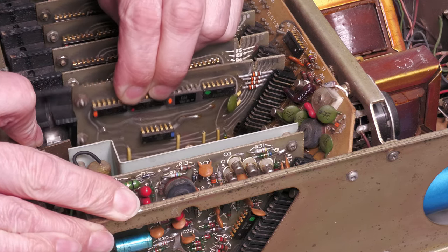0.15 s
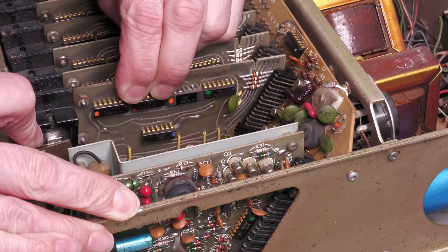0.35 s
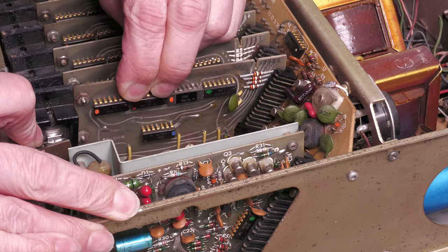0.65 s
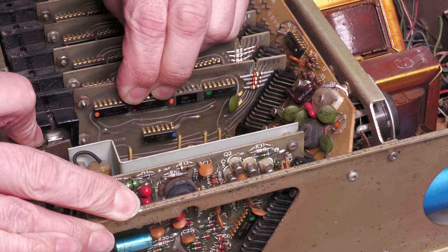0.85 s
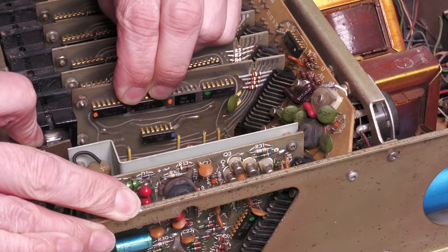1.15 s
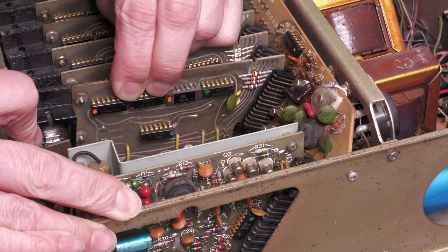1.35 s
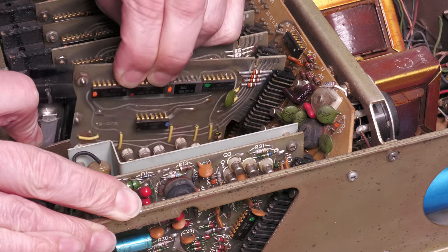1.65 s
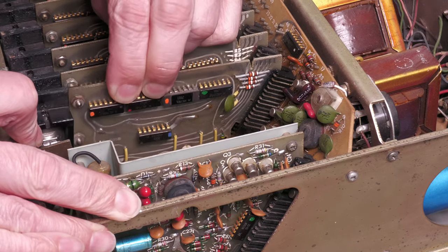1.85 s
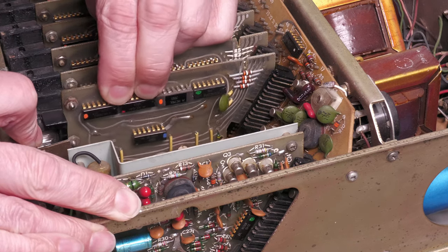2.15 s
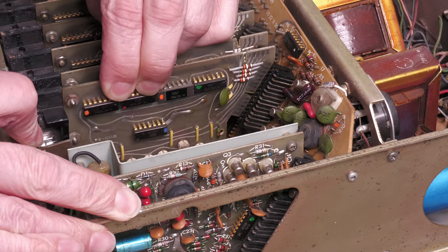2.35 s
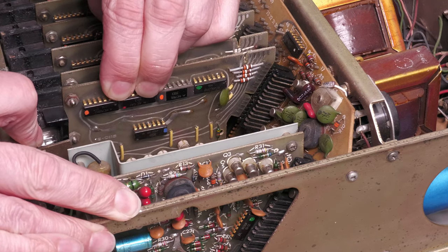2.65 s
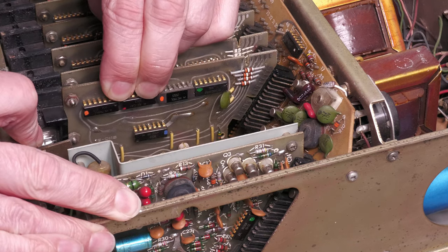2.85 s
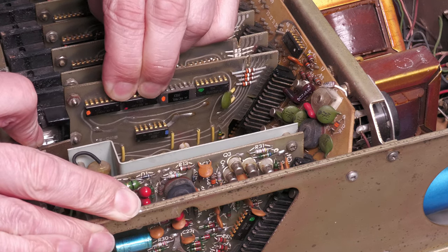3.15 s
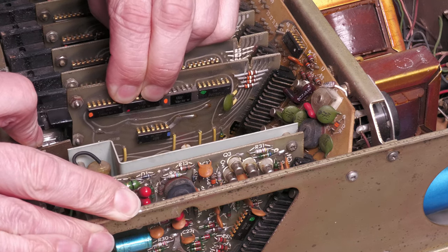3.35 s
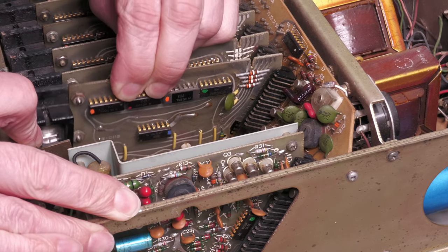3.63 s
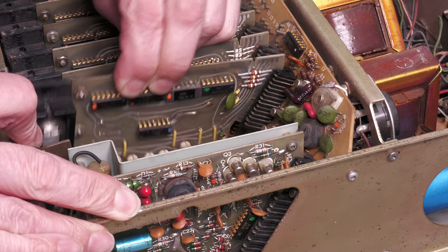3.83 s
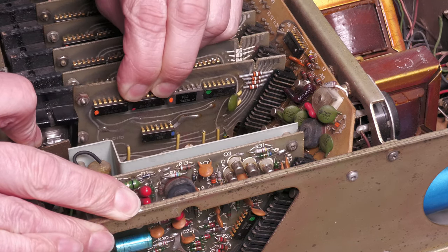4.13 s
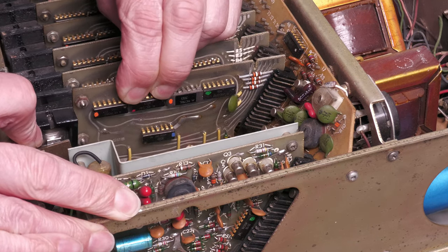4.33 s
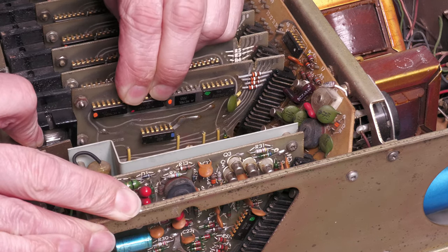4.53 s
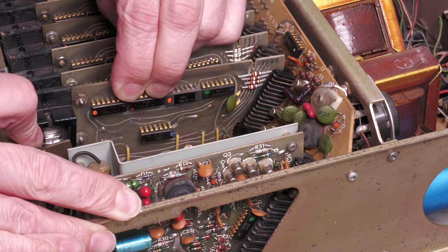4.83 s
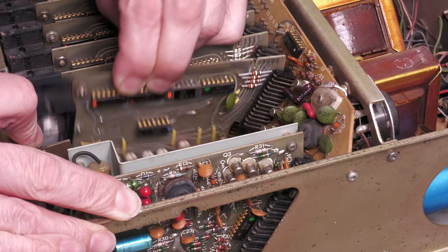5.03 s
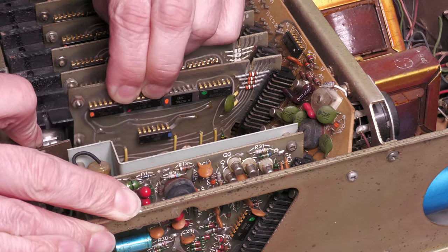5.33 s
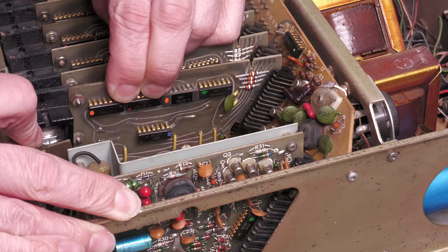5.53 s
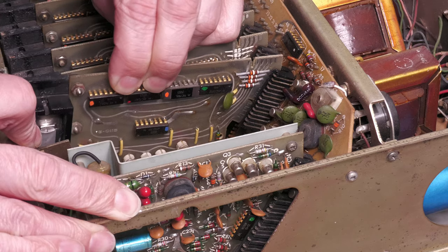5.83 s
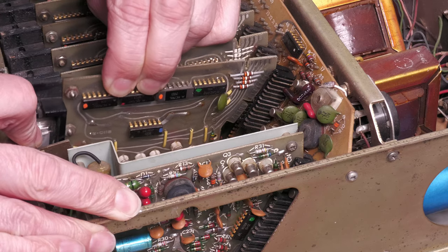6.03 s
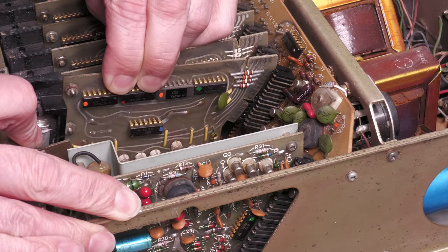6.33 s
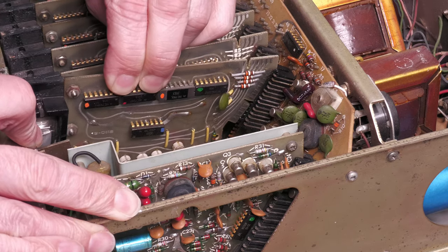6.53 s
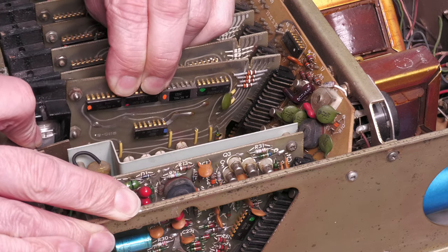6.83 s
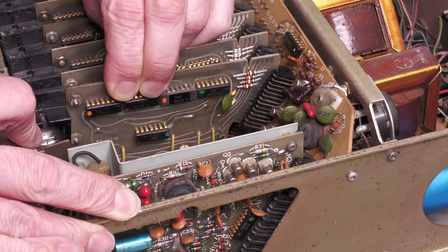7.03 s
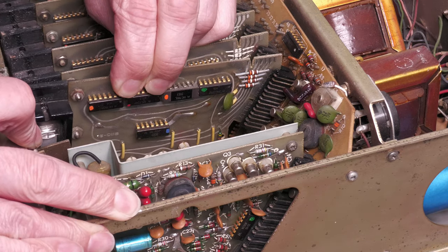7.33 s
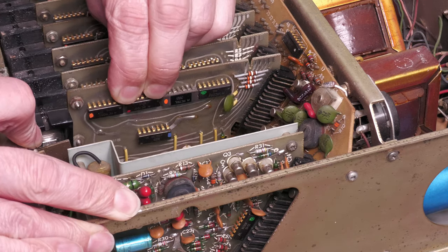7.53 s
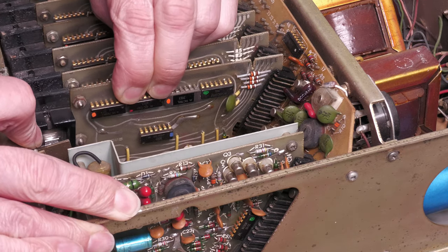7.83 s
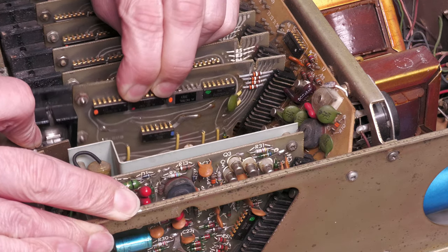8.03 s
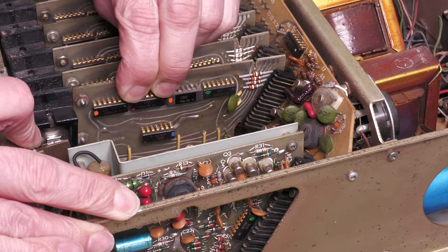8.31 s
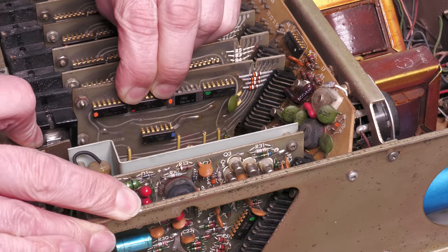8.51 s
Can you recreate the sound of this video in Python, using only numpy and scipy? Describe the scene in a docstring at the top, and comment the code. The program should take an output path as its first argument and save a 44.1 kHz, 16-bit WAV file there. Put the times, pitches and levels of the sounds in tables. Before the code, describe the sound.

A circuit card is rocked in and out of its connector inside a metal chassis. The spring contacts give short, high squeaks, often in little clusters, mixed with light knocks, sharp clicks and soft scrapes as the card meets its guides. The sounds come irregularly throughout, with brief pauses. It is heard up close in a small room, over a faint, steady machine hum.

```python
"""Short squeaks, scrapes and knocks over a faint machine hum in a small room.
A circuit card is rocked in and out of its edge connector inside a metal instrument chassis.
The spring contacts stick, slip and snap; the card knocks against its guides and seat.
Gain control ducks on the loud squeaks."""
import sys
import numpy as np
from scipy import signal
from scipy.fft import rfft, irfft
from scipy.io import wavfile
from scipy.ndimage import uniform_filter1d

SR = 44100
rng = np.random.default_rng(int(sys.argv[2]) if len(sys.argv) > 2 else 0)


def bounce(signal):
    """Save signal as a 16-bit WAV file at the path given by the first command-line argument."""
    frames = np.transpose(np.atleast_2d(signal))
    limited = np.clip(frames, -1, 1)
    pcm = np.round(limited * 32767).astype(np.int16)
    wavfile.write(sys.argv[1], SR, pcm)


N = 382344
TIME_S = np.arange(N) / SR

# Contact stick-slip. Each row: start in seconds, length in seconds, pitch in Hz, glide in Hz, level in dB.
SQUEAK_EVENTS = [ (0.128, 0.026, 2470, 18, -42.5), (0.143, 0.03, 2488, -17, -36),
                 (1.339, 0.042, 3585, -180, -51.5), (1.596, 0.0089, 3600, 0, -43.5),
                 (1.608, 0.047, 3346, -360, -30), (1.736, 0.04, 2310, -84, -32.5),
                 (1.774, 0.05, 2500, 447, -45), (1.967, 0.026, 3320, -130, -33.5),
                 (2.087, .04, 2600, -200, -50), (2.104, 0.057, 2210, 190, -37),
                 (3.52, 0.027, 3360, 40, -55.5), (3.546, .015, 3178, -50, -40.5),
                 (3.627, 0.061, 2650, 320, -60), (3.872, 0.012, 3244, -80, -35),
                 (3.907, 0.019, 2354, -100, -39.5), (3.985, 0.039, 2447, -10, -31.5),
                 (4.021, 0.031, 2697, -150, -49), (4.407, 0.023, 3240, 60, -58),
                 (4.757, 0.029, 3026, -370, -47.5), (5.07, 0.026, 3297, -110, -30),
                 (5.158, 0.059, 2345, -6, -28.5), (5.261, 0.038, 2130, 380, -32),
                 (5.393, 0.029, 3384, -300, -40.5), (5.733, 0.034, 2422, -130, -36),
                 (5.833, .04, 2440, -220, -32), (5.915, .039, 2440, 40, -46.5),
                 (6.882, 0.064, 2550, 80, -68), (7.274, 0.022, 3315, -210, -31),
                 (7.466, 0.022, 1960, 406, -40), (7.483, 0.024, 2330, 55, -36.5),
                 (7.624, 0.035, 3376, -120, -37.5), (7.66, 0.043, 3266, 0, -35.5),
                 (7.784, 0.027, 2616, 247, -47.5), (7.926, 0.038, 3460, -340, -52),
                 (7.973, 0.014, 3330, 123, -45), (8.179, 0.021, 3270, 40, -53.5)]
# Radiation of the springs. Each row: frequency in Hz, gain in dB.
SPRING_RESPONSE = [(1850, -6.5), (2130, -15.5), (2350, 1), (3400, -0.5), (4400, 5.5), (5000, 6.5),
                   (6700, -3.5), (7300, -1.5), (8700, 9.5), (10000, -2), (15000, 7)]
# Card hits guides and seat. Each row: start in seconds, clack in dB, tick and thump in dB over the clack.
KNOCK_EVENTS = [(0.0145, -43, 8, -14), (0.2347, -41, -25, -25), (0.2424, -60, 19, 6.5),
                (0.4995, -52, -40, -9.5), (0.6384, -56, -4, -11), (0.7936, -45.5, -27, -12),
                (1.3698, -59, -7, -5), (1.598, -66, 9, 7), (1.95, -57, 8.5, -2),
                (2.1785, -36.5, -13.5, -17), (2.1862, -34.5, -33, -34), (2.2826, -43.5, 7.5, -3.5),
                (2.77, -38, -4.5, -18), (3.257, -39, -5, -13.5), (3.716, -42, -4, -20.5),
                (3.8645, -52.5, 11, 0.5), (3.87, -42.5, 6, -28), (4.0446, -50.5, 11, -11),
                (4.146, -53.5, 4, 1), (4.327, -46.5, -54, -16), (4.701, -55, -5, -31),
                (5.005, -58.5, 9, 0.5), (5.4124, -47.5, 0, -5.5), (5.6079, -60.5, 2.5, -6),
                (5.7211, -43.5, 8.5, -13.5), (5.9761, -43, -17, -13), (5.9839, -37, -5, -24),
                (6.479, -51, -18, -21), (7.0558, -45, -7.5, -17), (7.6451, -55, 14.5, -3.5),
                (7.9548, -53.5, 4, -7), (8.109, -42, -9.5, -22), (8.1358, -48.5, 6, -13),
                (8.2045, -48.5, -7, -23)]
# A spring snaps over the card's edge. Each row: start in seconds, level in dB.
SNAP_EVENTS = [(0.0151, -39), (2.2794, -38.5), (2.3836, -56), (3.257, -40), (3.715, -29.5), (3.7283, -35.5),
               (6.479, -52.5)]
# Force of a snap. Each row: frequency in Hz, gain in dB.
SNAP_SPECTRUM = [(1300, -46), (5000, -15.5), (12000, 4.5)]
# Dense crack of a blow. Each row: frequency in Hz, octave-band gain in dB.
CRACK_SPECTRUM = [(150, 7), (300, -2.5), (600, 1.5), (1200, -3.5), (2400, 5), (4800, 7), (9600, 1.5),
                  (15000, -11)]
# Card and chassis modes. Each row: frequency in Hz, gain in dB, T60 in seconds.
BODY_MODES = [(135.9, 5, 0.38), (224.2, 13, 0.23), (268.7, 7, 0.11), (400.7, 2.5, 0.19), (485, -1, 0.21),
              (579, 3.5, 0.11), (853, 3, 0.098), (889, 6.5, 0.038), (1127, -2.5, 0.17), (1572, -0.5, 0.076),
              (1818, 0.5, 0.079), (2520, 2, 0.061), (3080, -7, 0.054), (3612, 8, 0.023), (4770, 10, 0.019),
              (5100, 5, 0.032), (7260, -5, 0.17), (8180, 5.5, 0.025)]
# Card slides on contacts and guides. Each row: start in seconds, length in seconds, level in dB.
SCRAPE_EVENTS = [(1.835, 0.04, -54), (3.25, 0.025, -51.5), (3.63, 0.07, -65), (3.78, 0.013, -71),
                 (5.722, 0.027, -44.5), (5.954, 0.045, -46.5), (6.065, 0.036, -57), (6.615, .024, -63.5),
                 (6.74, 0.3, -70), (7.462, 0.075, -55.5), (7.78, 0.083, -56.5), (7.95, 0.072, -69),
                 (8.065, 0.02, -55), (8.15, 0.13, -81), (8.32, .036, -63)]
# Friction noise. Each row: frequency in Hz, relative density in dB.
FRICTION_SPECTRUM = [(120, -4.5), (650, -9), (880, 2), (1150, -10.5), (1900, -7), (2600, 0), (3500, -7),
                     (4800, -4), (6200, -14), (8200, -10.5), (10500, -22.5), (15000, -19.5)]
# Reflections off chassis walls and bench. Each row: delay in seconds, gain in dB.
EARLY_ECHOES = [(.0029, -15.5), (.0074, -14), (0.011, -11.5)]
# Mains hum and fan whine. Each row: frequency in Hz, RMS level in dB.
HUM_TONES = [(150.7, -73.5), (199.2, -75), (468.3, -70), (1270, -81.5), (1340, -71.5), (2056, -80.5),
             (2143, -79.5), (2261, -86), (2412, -87), (3214, -92.5), (3483, -90), (4016, -91)]
# Room noise. Each row: frequency in Hz, relative density in dB.
AIR_SPECTRUM = [(30, -24), (90, -47), (112, -17), (135, -10.5), (280, 2), (340, -6), (620, -4.5),
                (950, -7.5), (1500, -15), (2200, -15.5), (3000, -21.5), (6500, -29.5), (15500, -33.5)]


def squeaks(firm_db=-32.5, sag_hz=135.4, jitter=0.02, beat_hz=120, flutter_db=4, brightening=0.77):
    """A contact spring sticks and slips; pressure flattens its pitch and strengthens its harmonics."""
    out = np.zeros(N)
    for start_s, length_s, pitch_hz, glide_hz, level_db in SQUEAK_EVENTS:
        progress, swell = stroke(length_s, fullness=0.6)
        size = len(progress)
        swell *= (1 - np.exp(-progress / 0.12)) ** 2   # vibration builds up
        push_db = level_db - firm_db
        bend_hz = sag_hz * from_db(push_db) * (2 * progress - 1) ** 2   # lowest in mid-slide
        hz = pitch_hz + glide_hz * (progress - 0.5) + bend_hz
        phase = 2 * np.pi * np.cumsum(hz * (1 + jitter * drift(867, size))) / SR
        # a fast flutter that deepens through the squeak
        beating_tone = np.sin(phase + 2 * np.pi * (beat_hz * TIME_S[:size] + rng.random()))
        tone = (np.sin(phase) + 0.37 * progress * beating_tone) * from_db(db_at(SPRING_RESPONSE, hz))
        for k, harmonic_db in enumerate((-7, -14.5, -22.5, -30.5, -38.5), start=2):
            partial_db = harmonic_db + brightening * push_db + db_at(SPRING_RESPONSE, k * hz)
            partial_db += 3 * drift(92, size)
            tone += from_db(partial_db) * np.sqrt(swell) * np.sin(k * phase)
        grip = from_db(level_db + flutter_db * drift(220, size))
        rasp = 1 + 0.015 * drift(2300, size)
        add(out, start_s, grip * rasp * swell * tone * np.sqrt(2))
    return out


def blow_forces():
    """Start and force spectrum of each blow: a knock is thump, clack and tick; a snap is all treble."""
    for start_s, clack_db, hardness_db, weight_db in KNOCK_EVENTS:
        thump_db, tick_db = clack_db + weight_db, clack_db + hardness_db
        yield start_s, [(220, thump_db), (800, clack_db), (1300, clack_db),
                        (5000, tick_db), (12000, tick_db - 27)]
    for start_s, level_db in SNAP_EVENTS:
        yield start_s, [(hz, level_db + force_db) for hz, force_db in SNAP_SPECTRUM]


def knocks_and_snaps(crack_db=-5, ring_db=-11, spread_db=3, rise_cycles=0.13, detune=0.026):
    """Each blow cracks, dying fastest in the treble, and rings the card and chassis modes."""
    out, t = np.zeros(N), TIME_S[:SR // 3]
    centres_hz = np.geomspace(160, 12500, 7)
    bands = [signal.butter(2, [hz / np.sqrt(2), hz * np.sqrt(2)], "band", fs=SR, output="sos")
             for hz in centres_hz]
    for start_s, force in blow_forces():
        blow = np.zeros(len(t))
        for hz, band in zip(centres_hz, bands):
            t60_s = 0.047 * (1000 / hz) ** 0.56
            envelope = (1 - np.exp(-t * hz / rise_cycles)) * from_db(-60 * t / t60_s)
            burst = rng.standard_normal(len(t)) * envelope * np.sqrt(SR / hz / np.sqrt(2))
            band_db = crack_db + db_at(CRACK_SPECTRUM, hz) + db_at(force, hz)
            blow += from_db(band_db) * signal.sosfilt(band, burst)
        for mode_hz, mode_db, t60_s in BODY_MODES:
            hz = mode_hz * (1 + detune * rng.standard_normal())   # grip and seating shift the modes
            rise = 1 - np.exp(-t * hz / rise_cycles)
            level_db = ring_db + mode_db + db_at(force, hz) + spread_db * rng.standard_normal()
            blow += from_db(level_db - 60 * t / t60_s) * rise * np.sin(2 * np.pi * (hz * t + rng.random()))
        add(out, start_s, blow)
    return out


def scrapes(grains_per_s=12000, spread_db=2.5, gain_db=-5.5, chatter_db=4,
            run_on_s=0.029, lead_s=0.011, drag_s=0.035):
    """Contacts slip over the pads in clumps of tiny grains, alone and under each squeak and knock."""
    under_squeaks = [(s, length_s + run_on_s, db - 21.5) for s, length_s, _, _, db in SQUEAK_EVENTS]
    under_knocks = [(s - lead_s, drag_s, db - 22) for s, db, *_ in KNOCK_EVENTS]
    pressure = np.zeros(N)
    for start_s, length_s, slide_db in SCRAPE_EVENTS + under_squeaks + under_knocks:
        _, swell = stroke(length_s, fullness=0.097)
        level_db = slide_db + gain_db + chatter_db * drift(276, len(swell))
        add(pressure, start_s, from_db(level_db) * swell)
    sizes = from_db(spread_db * np.minimum(rng.exponential(1, N), 4))
    signs = rng.choice([-1, 1], N)
    grains = unit_rms(sizes * signs * (rng.random(N) < grains_per_s / SR))
    return coloured(grains * pressure, FRICTION_SPECTRUM)


def room(x, treble_t60_s, wet_db, t60_s=0.17, split_hz=6000, build_s=0.0026):
    """Close echoes and a diffuse tail whose treble dies first."""
    t = TIME_S[:SR // 2]
    noise = rng.standard_normal(len(t))
    dull = signal.sosfilt(signal.butter(2, split_hz, fs=SR, output="sos"), noise)
    bright = signal.sosfilt(signal.butter(2, split_hz, "high", fs=SR, output="sos"), noise)
    tail = dull * from_db(-60 * t / t60_s) + bright * from_db(-60 * t / treble_t60_s)
    tail *= 1 - np.exp(-t / build_s)
    response = from_db(wet_db) * tail / np.linalg.norm(tail)
    response[0] += 1   # direct sound
    for delay_s, echo_db in EARLY_ECHOES:
        response[round(delay_s * SR)] += from_db(echo_db)
    return signal.fftconvolve(x, response)[:N]


def air_and_hum(air_db=-66, waver_db=2.5, wander_hz=0.75):
    """Steady air noise with slightly wavering mains hum and fan whine."""
    out = from_db(air_db) * coloured(rng.standard_normal(N), AIR_SPECTRUM)
    for hz, level_db in HUM_TONES:
        phase = 2 * np.pi * np.cumsum(hz + wander_hz * drift(7.2, N)) / SR
        out += from_db(level_db + waver_db * drift(6.4, N)) * np.sqrt(2) * np.sin(phase)
    return out


def gain_control(x, threshold_db=-34, slope=0.78, release_db_per_s=28, attack_s=0.0087, ahead_s=0.007):
    """Loud sounds pull the gain down fast; it creeps back."""
    power = uniform_filter1d(x[0] ** 2, SR // 250)
    level_db = 10 * np.log10(np.maximum(power, 1e-12))
    cut_db = slope * np.maximum(level_db - threshold_db, 0)
    release_db = release_db_per_s * TIME_S
    held_db = np.maximum.accumulate(cut_db + release_db) - release_db
    pole = np.exp(-1 / (attack_s * SR))
    smooth_db = signal.lfilter([1 - pole], [1, -pole], held_db)
    return x * from_db(-np.interp(TIME_S + ahead_s, TIME_S, smooth_db))


def stroke(length_s, fullness):
    """Progress 0-1 through a slide, and its pressure swell."""
    progress = np.linspace(0, 1, max(int(length_s * SR), 8))
    return progress, np.abs(np.sin(np.pi * progress)) ** fullness


def drift(rate_hz, size):
    """Random curve with a spread of about 1."""
    return np.interp(np.arange(size) / SR * rate_hz, np.arange(4096), rng.standard_normal(4096))


def coloured(x, spectrum):
    """Shape white input at constant power."""
    gain = from_db(db_at(spectrum, np.linspace(0, SR / 2, N // 2 + 1)))
    return irfft(rfft(x) * unit_rms(gain), N)


def db_at(spectrum, hz):
    """Interpolate on a log-frequency axis."""
    points_hz, points_db = np.array(spectrum).T
    return np.interp(np.log(hz + 0.0011), np.log(points_hz), points_db)


def add(out, start_s, sound):
    start = max(round(start_s * SR), 0)
    out[start:start + len(sound)] += sound[:N - start]


def from_db(db):
    return 10 ** (np.asarray(db) / 20)


def unit_rms(x):
    return x / np.sqrt(np.mean(x ** 2) + 1e-20)


def scene(low_cut_hz=116):
    """The card in the room, its deep bass removed by a steep zero-phase low cut, over air and hum."""
    card = room(squeaks(), treble_t60_s=0.15, wet_db=-9.5)
    card += room(scrapes() + knocks_and_snaps(), treble_t60_s=0.082, wet_db=-9)
    low_cut = signal.butter(6, low_cut_hz, "high", fs=SR, output="sos")
    return (signal.sosfiltfilt(low_cut, card) + air_and_hum())[None]


def record(dry, cutoff_hz=15950):
    """Gain control, then a steep low-pass."""
    low_pass = signal.ellip(12, 0.2, 80, cutoff_hz, fs=SR, output="sos")
    return signal.sosfilt(low_pass, gain_control(dry))


dry = scene()
out = record(dry)
bounce(out)
```